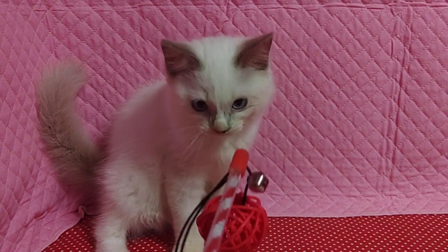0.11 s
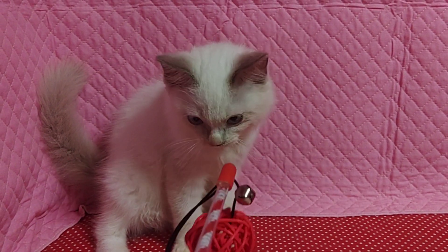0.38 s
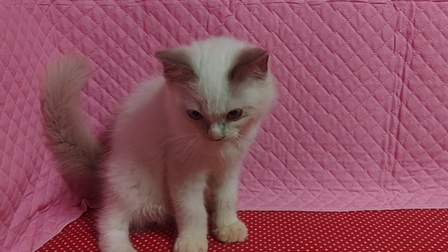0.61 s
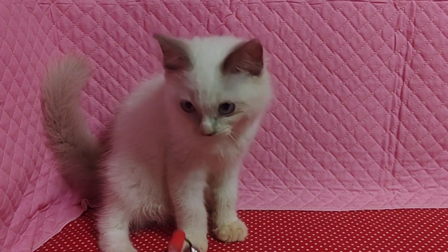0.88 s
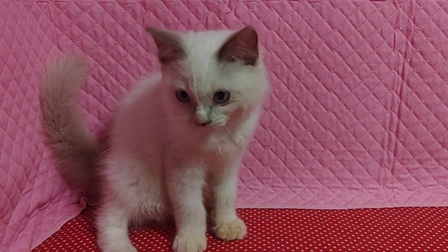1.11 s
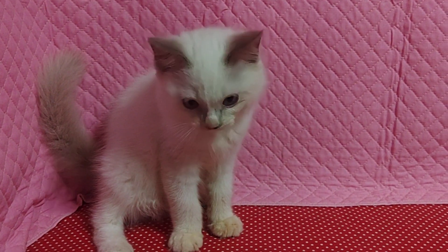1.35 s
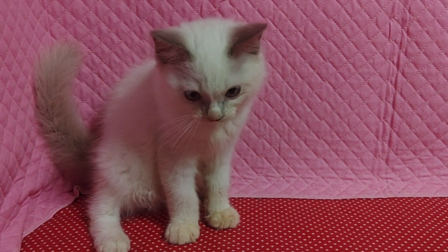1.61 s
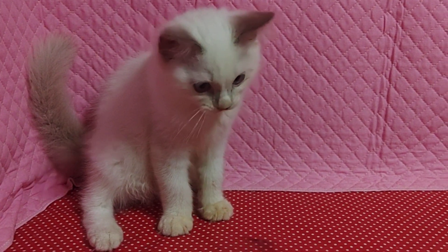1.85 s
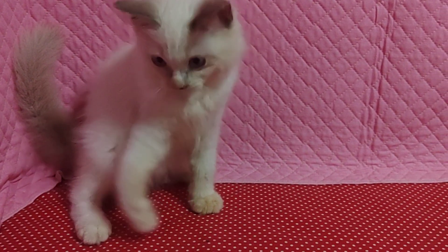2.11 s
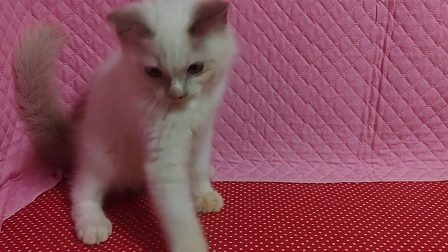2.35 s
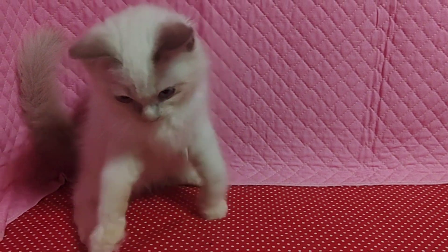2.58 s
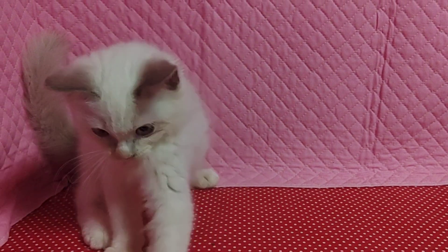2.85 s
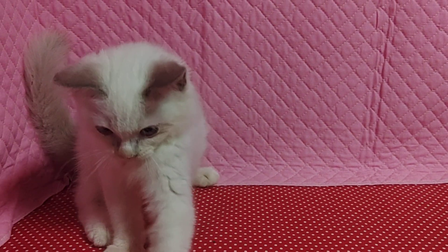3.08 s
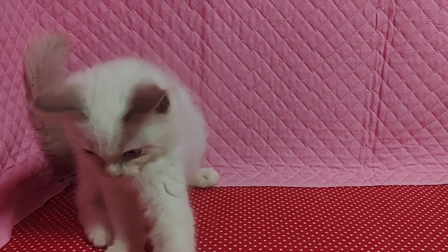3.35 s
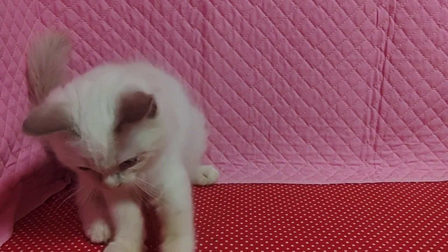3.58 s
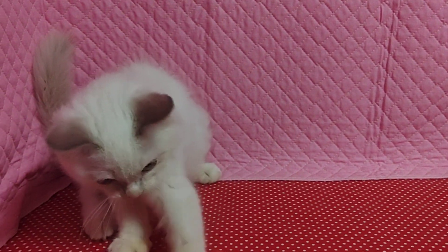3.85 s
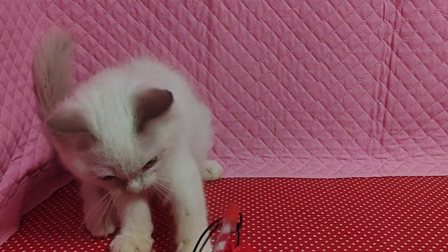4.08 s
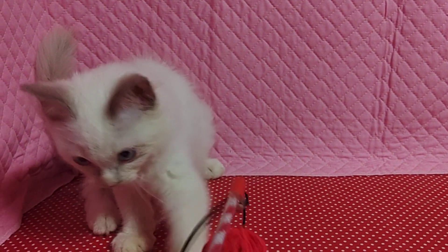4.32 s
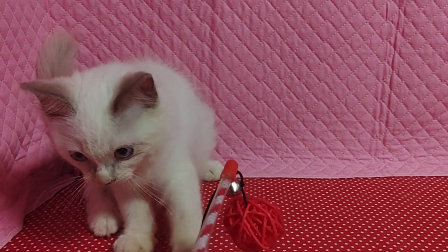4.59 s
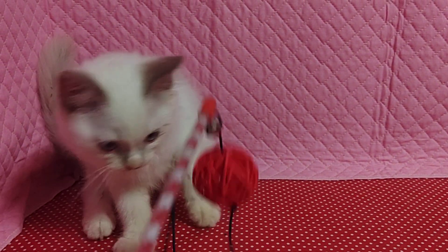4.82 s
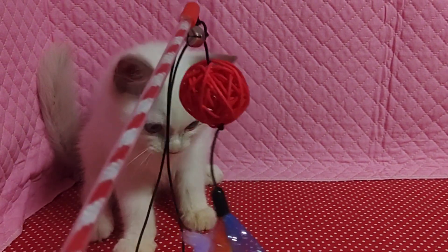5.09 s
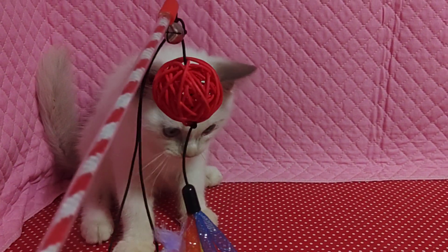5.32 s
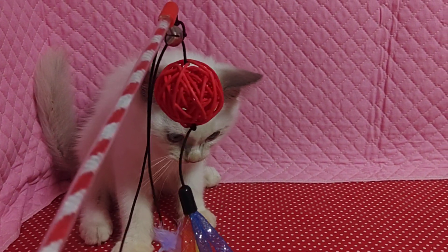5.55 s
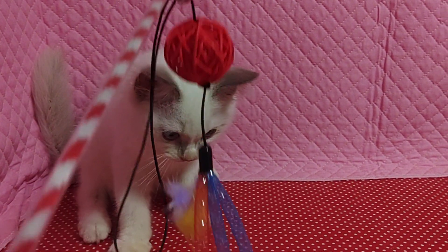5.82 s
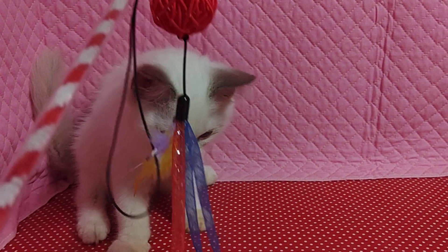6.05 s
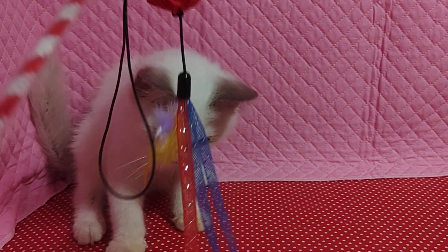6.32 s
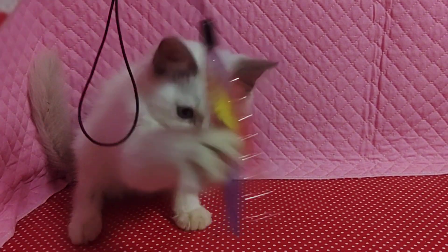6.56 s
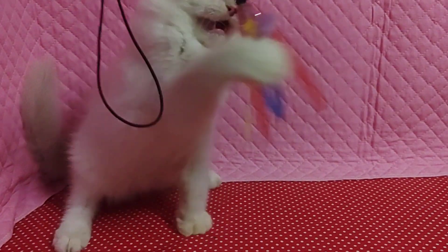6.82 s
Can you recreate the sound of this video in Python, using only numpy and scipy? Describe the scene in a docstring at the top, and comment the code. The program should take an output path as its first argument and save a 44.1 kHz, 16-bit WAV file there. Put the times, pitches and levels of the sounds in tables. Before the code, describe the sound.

A quiet, padded room with soft hiss, low rumble and faint mains hum; the toy is close to the microphone. Dull soft thumps and a low pressure swing come at 0.1-0.25 s. At 0.53 s a deeper boom bounces to rest by 1.2 s with quickening, softening thuds, while a woven ball knocks and scrapes and a tiny bell tinkles. Sparse light jingles follow until a sharp hollow knock with rattle at 1.8 s, and another at 2.03 s, trailing into scraping until 2.4 s. Short bursts of rustle, rasp and bright jingle come at 2.8, 3.1 and 3.5 s. Around 3.6-3.9 s a hard low shove and thumps shake the microphone; a second bounce dies by 4.7 s, with faint tinkles at 4.4 s. Then near quiet, with dry snaps at 5.86, 6.23 and 6.88 s. Very faint, short hoots sound far away at times.

```python
"""A quiet, padded room with hiss, rumble and a mains hum; the toy is close to a microphone on a stand.
A wand toy is dragged and batted over a cloth-covered floor: a pellet strikes inside its small metal bell
(decaying modes), the rattan ball knocks (resonances) and scrapes (grainy noise), ribbons rustle and snap.
Dull thumps, some bouncing to rest, boom in the floor as damped modes; shoves swing the pressure slowly.
Short faint hoots, plain swelling tones, come from far away."""
import sys
import numpy as np
from scipy import signal
from scipy.fft import rfft, irfft, next_fast_len
from scipy.io import wavfile
from scipy.ndimage import map_coordinates

SR = 44100
rng = np.random.default_rng(int(sys.argv[2]) if len(sys.argv) > 2 else 0)


def ratio_of_db(decibels):
    """Turn decibels (scalar or array-like) into linear amplitude factors; 0 dB maps to 1."""
    return 10 ** (np.asarray(decibels, float) / 20)


def materialize(psi):
    """Save the field psi as 16-bit PCM at rate SR to the path in sys.argv[1].

    A 1-D psi becomes a single channel; in a 2-D psi each row is a channel.
    """
    bounded = np.clip(np.atleast_2d(psi).T, -1, 1)
    quanta = np.round(bounded * 32767).astype(np.int16)
    wavfile.write(sys.argv[1], SR, quanta)


N = 305613  # samples


def unit(x):
    """Scaled to rms 1."""
    return x / np.sqrt(np.mean(x ** 2) + 1e-20)


def along(points, hz):
    """Points of (frequency_hz, value) read on a log frequency axis."""
    f, v = np.transpose(points)
    return np.interp(np.log(hz + 1), np.log(f + 1), v)


def curve(points):
    """Points of (time_s, value) joined by straight lines, one value per sample."""
    s, value = np.transpose(points)
    return np.interp(np.arange(N) / SR, s, value)


def wobble(rate):
    """A smooth random curve, rate knots a second."""
    knots = rng.standard_normal(int(N * rate / SR) + 4)
    return map_coordinates(knots, [np.arange(N) * rate / SR])


def filtered(x, response):
    """x times a complex response of frequency."""
    m = next_fast_len(len(x) + SR // 2)
    return irfft(rfft(x, m) * response(np.fft.rfftfreq(m, 1 / SR)), m)[:len(x)]


def coloured(x, spectrum):
    """Noise-like x given a (frequency_hz, level_db) colour, rms 1."""
    return unit(filtered(x, lambda hz: ratio_of_db(along(spectrum, hz))))


def resonances(modes):
    """Causal response of (frequency_hz, width_hz, level_db) resonances with alternating signs."""
    def response(f):
        total = 0
        for k, (centre, width, db) in enumerate(modes):
            damping = 1j * f * width
            total = total + (-1) ** k * ratio_of_db(db) * damping / (centre * centre - f * f + damping)
        return total
    return response


def bursts(times, levels_db, t60, spiky_db, first_db=-40):
    """Dying noise puffs; spiky ones are clusters of tiny contacts, each led by one first contact."""
    out, t = np.zeros(N + SR), np.arange(SR // 4) / SR
    for s, db in zip(times, levels_db):
        spikes = ratio_of_db(spiky_db * np.clip(rng.standard_normal(len(t)), -2.5, 2.5))
        contacts = unit(spikes * rng.standard_normal(len(t)))
        first = round(s * SR)
        out[first:][:len(t)] += ratio_of_db(db - 60 * t / t60) * contacts
        out[first] += ratio_of_db(db + first_db)
    return out[:N]


def grainy(spiky_db, lumpy_db, rate):
    """Friction: dense contacts of uneven size that come in clumps."""
    size = np.clip(rng.standard_normal(N), -2.5, 2.5)
    return ratio_of_db(spiky_db * size + lumpy_db * wobble(rate)) * rng.standard_normal(N)


def struck(modes, t):
    """Damped modes at slightly new strengths and pitches."""
    out = np.zeros(len(t))
    for hz, db, t60 in modes:
        size = ratio_of_db(db + rng.normal(0, 0.85) - 60 * t / t60)
        out += size * np.sin(2 * np.pi * hz * rng.normal(1, 0.021) * t)
    return out


def strokes(s, length, peak_at, gains):
    """Power sum of movements that swell to a peak and die away."""
    rise_bend, fall_bend = 0.97, 1.37  # powers that bend the straight rise and fall
    out = np.zeros(N)
    for start, span, top, gain in zip(s, length, np.clip(peak_at, .02, .95), gains):
        part = np.arange(round(span * SR)) / (span * SR)
        shape = np.where(part < top, (part / top) ** rise_bend, ((1 - part) / (1 - top)) ** fall_bend)
        out[round(start * SR):][:len(part)] += (gain * shape) ** 2
    return np.sqrt(out)


# colours of the room hiss and the low rumble: frequency_hz, relative level_db per Hz
ROOM_TONE = [(100, -10.5), (160, -3.5), (205, -6.5), (255, 0.5), (300, -6), (365, -3.5), (450, -7.5),
             (700, -11), (1200, -13), (2100, -9), (2700, -13), (3700, -23), (8000, -25), (11700, -26),
             (13800, -22), (15600, -26.5), (16200, -38)]
RUMBLE_COLOUR = [(3, 1.35), (20, -4), (35, -14), (52, -22), (78, -16.5), (100, -35), (138, -24),
                 (175, -42.5), (230, -96)]
# courses of the rumble and the hum before the dips: time_s, rms level_db
RUMBLE_LEVEL = [(0, -39.5), (.5, -36), (1.3, -42), (2.5, -46), (3.6, -46), (3.75, -31.5), (4.8, -43),
                (5.4, -46.5), (6.3, -46), (6.93, -42.5)]
HUM_LEVEL = [(0, -63), (3.5, -63.3), (4.8, -59.5), (6.93, -57.8)]
# the whole background dips briefly: start_s, length_s, depth_db
DIPS = [(3.608, 0.43, 3.5), (5.408, 0.31, 6.5)]


def background():
    """Room hiss and low rumble as coloured noise, and a mains hum as one sine of drifting level."""
    t = np.arange(N) / SR
    dip_db = np.zeros(N)
    for s, length, depth_db in DIPS:
        part = np.clip((t - s) / length, 0, 1)
        dip_db += depth_db * (1 - np.abs(2 * part - 1))
    hiss = ratio_of_db(-63.5 + 0.7 * wobble(5.1)) * coloured(rng.standard_normal(N), ROOM_TONE)
    rumble = ratio_of_db(curve(RUMBLE_LEVEL)) * coloured(rng.standard_normal(N), RUMBLE_COLOUR)
    hum = ratio_of_db(curve(HUM_LEVEL)) * np.sqrt(2) * np.sin(2 * np.pi * 119.6 * t)
    return ratio_of_db(-dip_db) * (hiss + rumble + hum)


# short faint hoots far away: start_s, length_s, pitch_hz, relative level_db
HOOTS = [(0.11, 0.15, 1367, -66), (1.576, 0.11, 367.4, -49.5), (1.998, 0.063, 365, -57.5),
         (2.316, 0.072, 365, -56), (2.393, .1, 1176, -68), (2.55, 0.15, 1280, -66.5),
         (3.41, 0.11, 364, -58), (6.063, .06, 376, -61), (6.843, 0.062, 381, -58)]


def hoots():
    """Soft single tones that swell and fade."""
    t = np.arange(N) / SR
    out = np.zeros(N)
    for s, length, hz, db in HOOTS:
        part = np.clip((t - s) / length, 0, 1)
        swell = np.sqrt(np.abs(np.sin(np.pi * part)))
        out += ratio_of_db(db - 4.5) * swell * np.sin(2 * np.pi * hz * t)
    return out


# a shove moves the stand down and back once:
# start_s, length_s, relative level_db, haste (0-1, 1 = even)
SHOVES = [(.128, .27, -19.5, .75), (3.655, .115, -11, .95)]
# after the hard shove the stand keeps swaying: start_s, pitch_hz, level_db, t60_s
SWAY = (3.765, 10.3, -20, 1.6)


def shoves():
    """Slow pressure swings when the microphone stand is pushed, then a dying sway."""
    t = np.arange(N) / SR
    out = np.zeros(N)
    for s, length, db, haste in SHOVES:
        part = np.clip((t - s) / length, 0, 1) ** haste
        soft_ends = np.abs(np.sin(np.pi * part)) ** .3
        out -= ratio_of_db(db) * np.sin(2 * np.pi * part) * soft_ends
    s, hz, db, t60 = SWAY
    age = np.maximum(t - s, 0)
    return out - ratio_of_db(db - 60 * age / t60) * np.sin(2 * np.pi * hz * age)


# two thumps set something heavy bouncing to rest: thump_s, then the start_s of each landing
BOUNCES = [(.535, .757, .899, .993, 1.077, 1.158, 1.218), (3.928, 4.166, 4.345, 4.469, 4.559, 4.633, 4.683)]


def landings():
    """Thump rows for the bounces: the shorter the flight, the softer the landing."""
    rows = []
    for times in BOUNCES:
        halvings_db = 6.5 * np.log2(np.diff(times) / .2)  # 6.5 dB a halving, from a .2 s flight
        boom_db = -30.5 + halvings_db
        rows += zip(times[1:], boom_db, boom_db - 29, boom_db - 24)  # boom, puff, knock
    return rows


# thumps through the floor: start_s, then relative boom_db, puff_db, knock_db
THUMPS = [(.135, -42.5, -68, -61), (0.162, -35.5, -69, -61), (.242, -41.5, -77, -64),
          (.535, -28.5, -55, -53), (1.795, -56, -64.5, -72), (2.027, -46.5, -66.5, -59.5),
          (3.585, -38, -65, -59), (3.665, -35, -70, -66), (3.792, -45, -63.5, -50), (3.861, -40, -82, -54),
          (3.928, -32.5, -58, -56.5)]
# modes of the floor boards, and of a stiffer panel that knocks along: pitch_hz, relative level_db, t60_s
BOARDS = [(78.4, 5.5, 0.27), (85.3, 0, 0.32), (57.8, -11, 0.42), (39.8, 2.5, 0.18), (131, -12, 0.17)]
PANEL = [(252.9, 2.5, 0.28), (296.5, 3, 0.203), (347, -2.5, 0.47)]
# colour of the puff: frequency_hz, relative level_db
PUFF = [(120, 10.5), (250, -2), (600, -3.5), (1500, -10.5), (3000, -22), (9000, -29.5), (16000, -44)]


def thumps():
    """Each thump booms in the boards, knocks a panel, pushes the microphone once and puffs."""
    out, t = np.zeros(N + SR), np.arange(SR) / SR
    push = ratio_of_db(7.5) * (t / 0.031) * (1 - t / 0.077) * np.exp(1 - t / 0.028)
    soft = 1 - np.exp(-t / 0.034)  # a padded contact builds up slowly
    rows = THUMPS + landings()
    for s, boom_db, _, knock_db in rows:
        boom = ratio_of_db(boom_db - 1.5) * (struck(BOARDS, t) * soft + push)
        knock = ratio_of_db(knock_db - 0.5) * struck(PANEL, t) * soft
        out[round(s * SR):][:len(t)] -= boom + knock
    s, _, puff_db, _ = np.transpose(rows)
    air = bursts(s, puff_db + 19.5, t60=0.34, spiky_db=5.0)
    return out[:N] + filtered(air, lambda hz: ratio_of_db(along(PUFF, hz)))


# the ball slides on the cloth:
# start_s, length_s, relative peak level_db, place of the peak (0-1), hollowness (0-1)
SLIDES = [(.52, 0.16, -72, 0.4, 0.8), (0.614, 0.2, -62, 0.4, 0.4), (.72, 0.58, -66, .3, 0.54),
          (1.077, 0.077, -57, 0.7, 0.1), (1.15, 0.059, -61.5, .4, 0.4), (1.2, 0.16, -66.5, 0.6, 0.5),
          (1.4, 0.53, -65.5, 0.5, 0.2), (1.779, .15, -51, 0.13, 0.15), (2.023, 0.033, -47.5, 0.27, 0.9),
          (2.045, 0.25, -55.5, 0, .05), (2.125, .28, -54.5, 0.5, 0.24), (2.43, .1, -66, 0.1, .05),
          (2.56, 0.1, -71, 0.7, 0.8), (2.778, .22, -52, 0.22, 0.21), (3.046, 0.25, -57.5, 0.24, 0.26),
          (3.12, 0.13, -53, 0.36, 0.33), (3.24, .27, -68.5, 0.26, .3), (3.406, 0.1, -57, 0.23, .05),
          (3.52, 0.046, -54.5, 0.34, .05), (3.558, 0.16, -54, 0.34, 0.78), (3.897, 0.25, -67, 0.26, 0),
          (4.15, 0.086, -67.5, 0.4, 0.5), (4.25, 0.79, -67, 0.23, 0.63)]
# colours of a light scrape, and of a ball pressed hard that sounds its cavity:
# frequency_hz, relative level_db per Hz
SCRAPE = [(500, -32), (900, -12), (1200, 2.5), (2200, 1.7), (3200, 1), (4300, -1.5), (5200, -12),
          (7000, -13)]
HOLLOW = [(1300, -29), (1900, -7.5), (2300, -3), (2800, -13.5), (4000, -36)]


def slides():
    """Sliding rasps the ball: grainy friction shared between the scrape and cavity colours."""
    start, length, scrape_db, peak_at, hollow = np.transpose(SLIDES)
    hollow = np.clip(hollow, 0, 1)
    rasp = grainy(spiky_db=9, lumpy_db=3.3, rate=140)
    light = strokes(start, length, peak_at, ratio_of_db(scrape_db) * (1 - hollow)) * coloured(rasp, SCRAPE)
    pressed = strokes(start, length, peak_at, ratio_of_db(scrape_db) * hollow) * coloured(rasp, HOLLOW)
    return light + pressed


# the wand is shaken: start_s, length_s, ribbon rustle peak level_db, place of the peak (0-1),
# rolling pellet peak level_db (both levels relative)
SHAKES = [(0.537, 0.064, -74, 0.2, -83), (0.673, 0.072, -59.5, 0.4, -56.5), (.74, 0.42, -75, 0.14, -73),
          (1.064, .03, -64, .45, -66), (1.107, 0.044, -62, .8, -60), (1.14, 0.081, -60, 0.4, -53),
          (1.2, 0.27, -77, .1, -71), (1.4, 0.57, -76, 0.53, -75), (1.78, 0.15, -58, 0.19, -56),
          (1.883, 0.18, -71, 0.86, -67), (2.022, 0.058, -60, .15, -62), (2.04, 0.15, -59.5, 0.13, -65),
          (2.17, 0.25, -63, 0.37, -83), (2.42, 0.11, -72, .4, -75), (2.79, 0.098, -54, 0.23, -60),
          (2.822, 0.25, -64, 0.06, -62), (3.07, 0.12, -64, 0.9, -75), (3.162, 0.14, -65, 0, -64),
          (3.36, .05, -68, .6, -69), (3.415, 0.13, -67, 0.07, -69), (3.51, 0.22, -66, 0.22, -62.5),
          (3.918, .2, -74, 0.1, -86), (4.3, 0.44, -78, 0.2, -75)]
# colours of the ribbons and of the rolling pellet: frequency_hz, relative level_db per Hz
RUSTLE = [(3000, -58), (5300, -16.5), (6800, -6.5), (8200, -4.5), (9500, -14), (11500, -25), (16000, -31)]
ROLL = [(7000, -10), (10000, -4.5), (12000, -1.5), (13800, 0), (15800, -12), (17000, -31)]


def wand():
    """Shaking rustles the ribbons, rolls the pellet and jingles the bell."""
    start, length, rustle_db, peak_at, roll_db = np.transpose(SHAKES)
    rolling = strokes(start, length, peak_at, ratio_of_db(roll_db))
    ribbons = coloured(grainy(spiky_db=5, lumpy_db=2.5, rate=120), RUSTLE)
    rustle = strokes(start, length, peak_at, ratio_of_db(rustle_db)) * ribbons
    roll = rolling * coloured(grainy(spiky_db=7, lumpy_db=3, rate=150), ROLL)
    return rustle + roll + bell(rolling)


# the ball hits the floor: start_s, relative level_db, brightness_db (strands over body)
KNOCKS = [(0.6457, -35, -13), (0.6713, -32, -12), (0.6973, -37.5, -4), (1.093, -43, -11),
          (1.1055, -34.5, -10), (1.1229, -35, -6), (1.427, -41.5, -25), (1.7103, -43, -15),
          (1.7912, -21, -9.5), (1.8854, -35, -14), (2.0283, -27, -8.5), (2.038, -35, -16), (2.055, -36, -9),
          (2.2192, -42.5, -19), (2.7869, -42, -14), (2.8, -50, -3), (3.0672, -44, -17), (3.533, -57, -4)]
# resonances of the woven body and of its thin outer strands: frequency_hz, width_hz, relative level_db
RATTAN = [(1210, 1030, 6), (2070, 1680, 4), (3140, 820, -3.5), (4010, 490, -5.5)]
STRANDS = [(6300, 1700, -11), (8840, 860, -7.5), (12800, 2400, -17)]


def knocks():
    """Knocks ring the ball's woven body and, by brightness, its thin strands."""
    s, db, bright_db = np.transpose(KNOCKS)

    def body_response(hz):
        no_bass = (1j * hz / (1000 + 1j * hz)) ** 3  # a small hollow ball radiates no bass
        return resonances(RATTAN)(hz) * no_bass

    body = filtered(bursts(s, db + 0.5, t60=0.02, spiky_db=6, first_db=-15), body_response)
    thin = bursts(s, db + bright_db + 2.5, t60=0.019, spiky_db=0, first_db=21.5)
    return body + filtered(thin, resonances(STRANDS))


# bell shell, one list a family of modes: pitch_hz, relative level_db, t60_s
BELL = [
    [(11304, 1.5, .11)],
    [(9624, -6.5, .2), (9770, -7, .2), (9076, -12, .15)],
    [(5630, 1, .21)],
    [(4734, -5.5, .22), (4839, -7.5, .22)],
]
# where on the shell each family of BELL rings best: spot_degrees
SWEET_SPOTS = [0, 90, 270, 180]


def ringing(s, ring_db, spot):
    """Each strike stops the old ring and starts a new one; the spot struck picks the modes."""
    spot_db = 12  # loss a quarter turn away from the sweet spot, twice that on the far side
    t = np.arange(N) / SR
    last = np.maximum(np.searchsorted(s, t) - 1, 0)
    age = np.where(t > s[0], t - s[last], 9)
    onset = 1 - np.exp(-age / .0012)
    ring = np.zeros(N)
    for family, best in zip(BELL, SWEET_SPOTS):
        strength_db = ring_db - spot_db * (1 - np.cos(np.radians(spot - best)))
        for hz, db, t60 in family:
            share_db = (len(family) > 1) * 2.5 * rng.standard_normal(len(s))  # close modes share unevenly
            phase = rng.uniform(0, 2 * np.pi, len(s))
            touch_db, turn = 2.6 * wobble(130), .8 * wobble(60)  # the loose pellet keeps brushing the shell
            size = ratio_of_db(strength_db[last] + db + share_db[last] - 60 * age / t60 + touch_db)
            ring += size * onset * np.sin(2 * np.pi * hz * t + turn + phase[last])
    return ring


# clear pellet strikes: start_s, relative tick_db, relative ring_db, spot_degrees on the shell
STRIKES = [(.6779, -53, -70, 60), (.6958, -62, -54, 330), (.7185, -49, -56, 60), (.7612, -56, -63, 35),
           (.7881, -49, -70, 300), (.842, -53, -61.5, 240), (.9264, -66, -62, 270),
           (0.948, -52, -60.5, 287), (1.0758, -40, -54.5, 110), (1.1114, -53, -63, 150),
           (1.142, -31, -47.5, 25), (1.1778, -34, -60, 270), (1.1994, -48, -52, 27),
           (1.2564, -64, -64, 100), (1.2974, -65, -61, 77), (1.3154, -68, -68, 250),
           (1.4336, -66, -58.5, 11), (1.47, -51, -54.5, 32), (1.501, -62, -63, 30), (1.6154, -60, -62, 35),
           (1.6574, -60, -58, 21), (1.7104, -62, -70, 260), (1.7649, -53, -51, 45), (1.779, -48, -46, 71),
           (1.7937, -36, -57, 66), (1.8257, -42, -52, 190), (1.8574, -54, -59, 310),
           (1.9363, -45, -70, 320), (1.9674, -53, -53, 320), (2.0018, -52, -55.5, 330),
           (2.0288, -50, -60, 45), (2.0414, -65, -57, 270), (2.056, -53, -47, 344),
           (2.0815, -47, -49.5, 223), (2.1044, -58, -51.5, 5), (2.154, -46, -64, 12),
           (2.788, -44.5, -65, 60), (2.8134, -40, -58, 33), (2.8314, -51, -59, 220),
           (2.8694, -54, -52, 260), (2.886, -35.5, -51, 306), (2.9422, -57, -60, 320),
           (3.0769, -47, -72, 60), (3.104, -42, -44.5, 370), (3.1294, -54, -61, 230),
           (3.171, -36, -44.5, 286), (3.187, -58, -49, 233), (3.3384, -75, -60, 12), (3.3863, -44, -71, 12),
           (3.431, -39, -56.5, 49), (3.5302, -37, -53.5, 244), (3.551, -39, -42, 5),
           (3.583, -44, -45.5, 116), (3.6194, -63, -53, 44), (3.7044, -63, -70, 12), (4.07, -75, -72, 290),
           (4.3645, -53, -57, 40), (4.3754, -63, -56, 344), (4.4094, -67, -69, 270)]
# colour of the pellet tick: frequency_hz, gain_db
TICK = [(2000, -31), (5000, -14), (8000, 3), (11000, -9), (13500, 5), (16000, -22)]


def bell(roll):
    """Clear strikes and, at random, faint ones as strong as the pellet rolls; each has a bright tick."""
    s, tick_db, ring_db, spot = np.transpose(STRIKES)
    count = round(25 * N / SR)  # 25 chances a second, silent while the pellet rests
    at = np.sort(rng.integers(0, N, count))
    faint_db = 20 * np.log10(roll[at] + 1e-9) + 4 * rng.standard_normal(count)
    clear_ring = ringing(s, ring_db, spot)
    faint_ring = ringing(at / SR, faint_db + 4, rng.uniform(0, 360, count))
    heard = roll[at] > 0
    tick_s = np.append(s, at[heard] / SR)
    all_tick_db = np.append(tick_db, faint_db[heard] + 6) - 3.0
    ticks = bursts(tick_s, all_tick_db, t60=0.016, spiky_db=5.5, first_db=4)
    return clear_ring + faint_ring + filtered(ticks, lambda hz: ratio_of_db(along(TICK, hz)))


# lone dry snaps of the ribbons: start_s, relative level_db
SNAPS = [(5.8554, -54), (6.234, -44), (6.8753, -44)]


def snaps():
    """Each snap is a click and a short puff, coloured by the thin-strand resonances."""
    s, db = np.transpose(SNAPS)
    clicks = bursts(s, db + 0.5, t60=0.014, spiky_db=-4, first_db=17)
    return filtered(clicks, resonances(STRANDS))


# decay of the room's answer: frequency_hz, t60_s
WALLS = [(200, 0.79), (2000, 0.28), (10000, 0.085)]


def walls(x):
    """Each frequency of the room's answer dies at its own speed."""
    hz, t, z = signal.stft(rng.standard_normal(SR // 3), SR, nperseg=256)
    decay = ratio_of_db(-60 * t / along(WALLS, hz)[:, None])
    tail = signal.istft(z * decay, SR, nperseg=256)[1]
    late = np.pad(x, (200, 0))  # the answer starts 200 samples late
    return signal.fftconvolve(late, tail / np.linalg.norm(tail))[:N]


def scene():
    """The toy near the microphone, in the room, over thumps and background."""
    toy = slides() + wand() + knocks() + snaps()
    room = ratio_of_db(-9.5) * walls(toy)
    return (background() + hoots() + shoves() + thumps() + toy + room)[None]


def low_pass(x):
    """Removes everything above the highest recorded frequency."""
    return signal.sosfilt(signal.butter(12, 16430, fs=SR, output="sos"), x)


def record(dry):
    """Takes the finished mix to its final form."""
    return low_pass(dry)


dry = scene()
out = record(dry)
materialize(out)
```